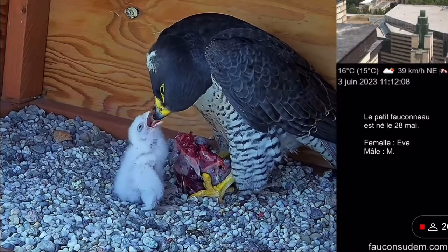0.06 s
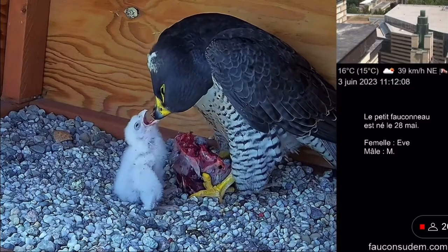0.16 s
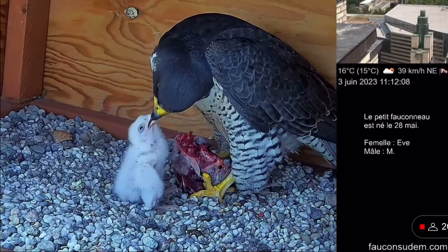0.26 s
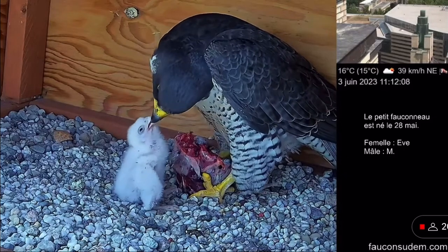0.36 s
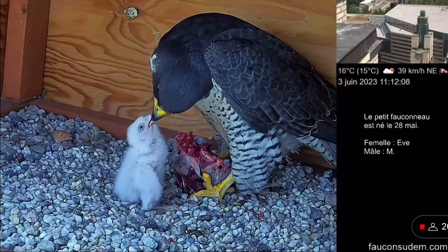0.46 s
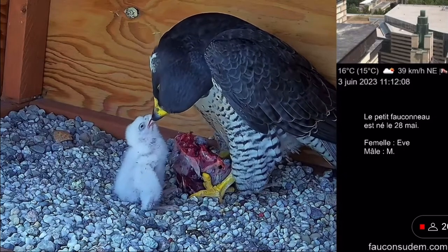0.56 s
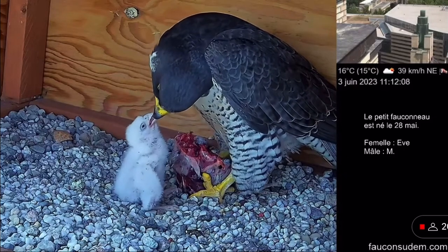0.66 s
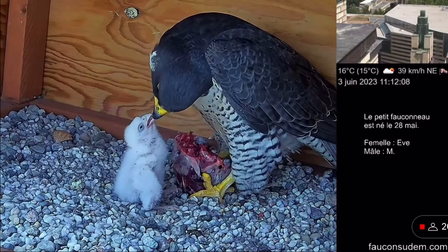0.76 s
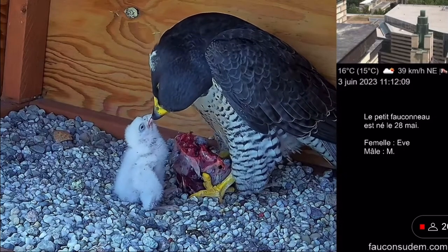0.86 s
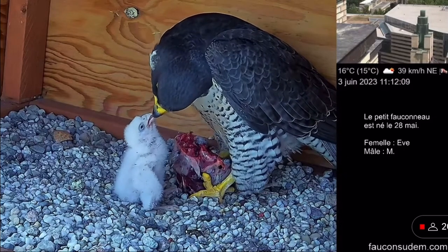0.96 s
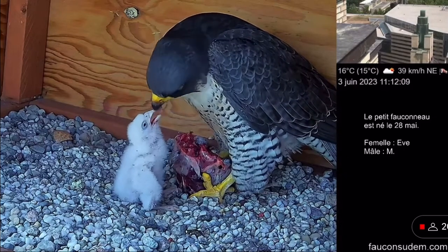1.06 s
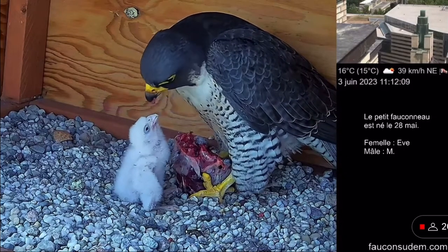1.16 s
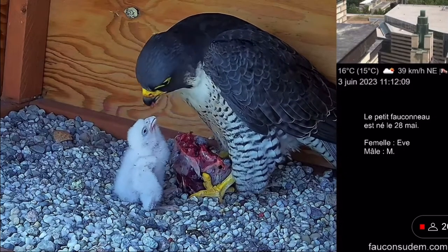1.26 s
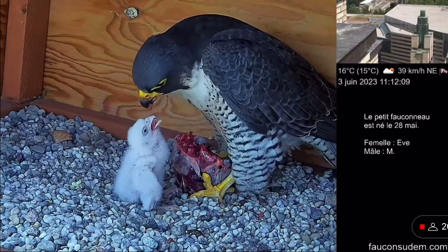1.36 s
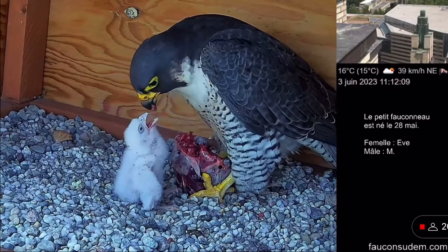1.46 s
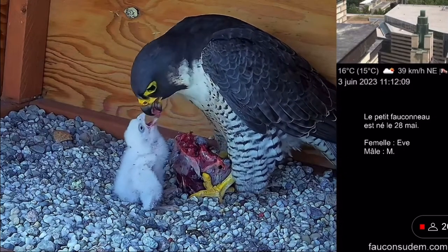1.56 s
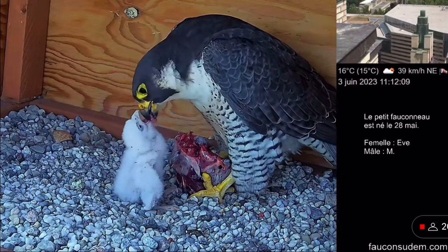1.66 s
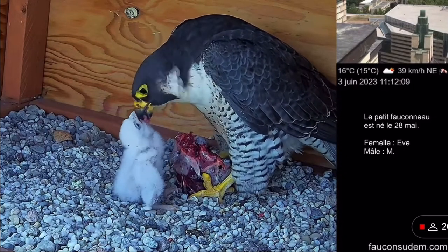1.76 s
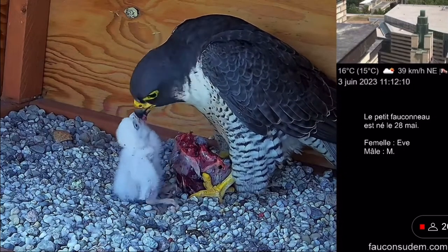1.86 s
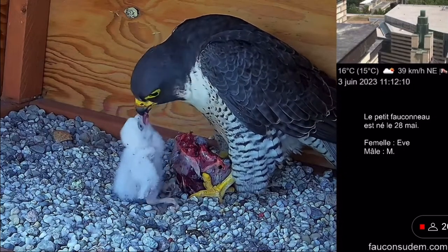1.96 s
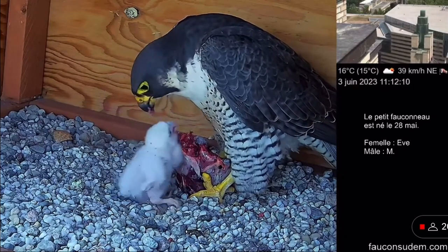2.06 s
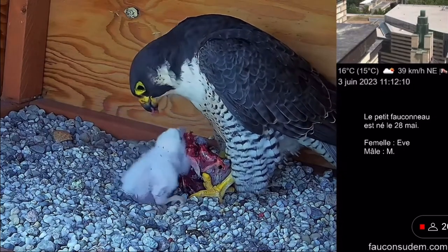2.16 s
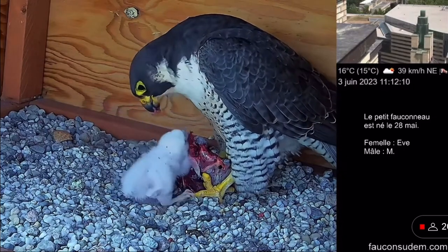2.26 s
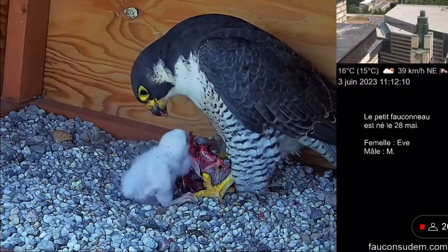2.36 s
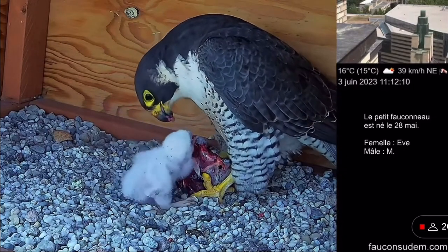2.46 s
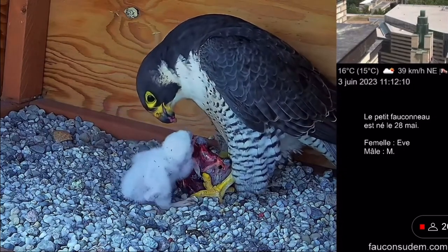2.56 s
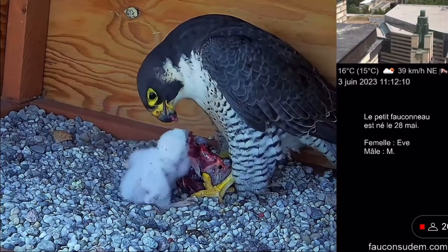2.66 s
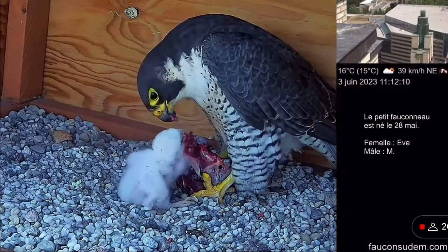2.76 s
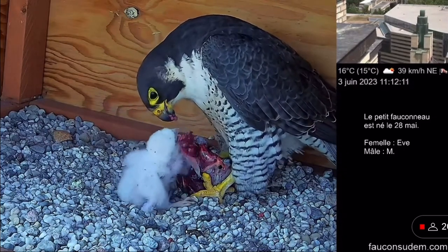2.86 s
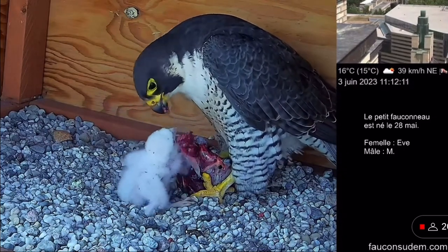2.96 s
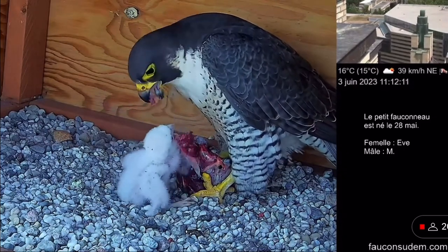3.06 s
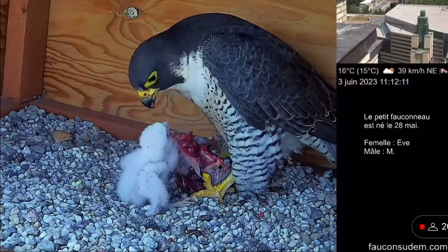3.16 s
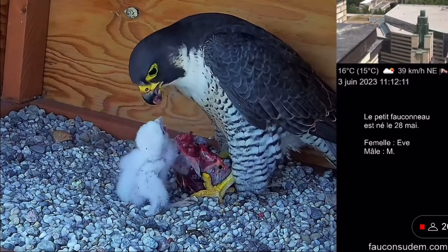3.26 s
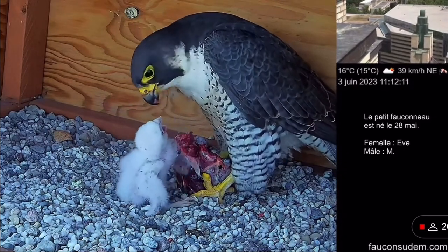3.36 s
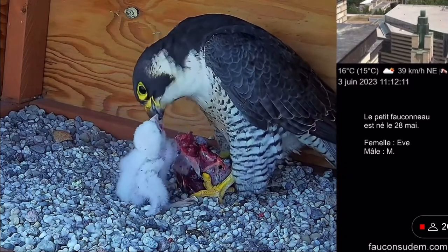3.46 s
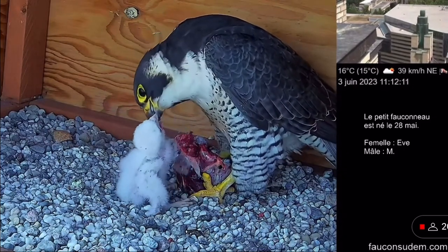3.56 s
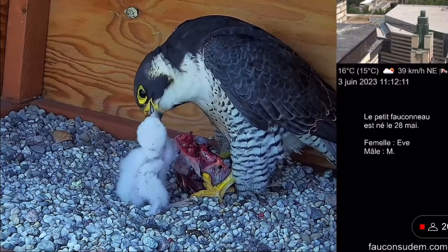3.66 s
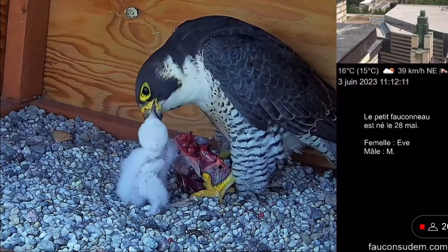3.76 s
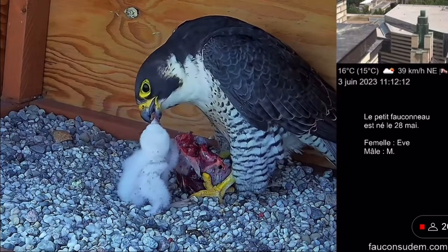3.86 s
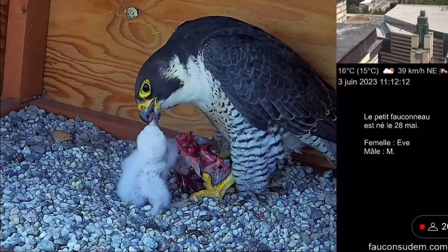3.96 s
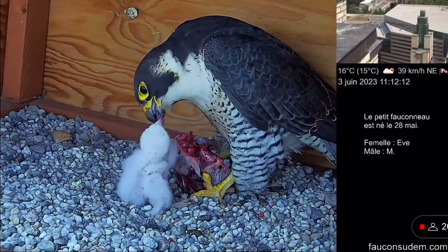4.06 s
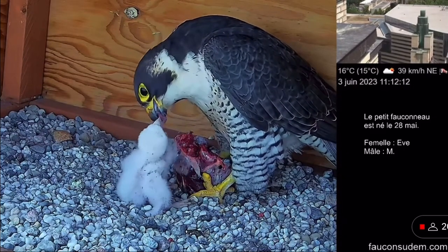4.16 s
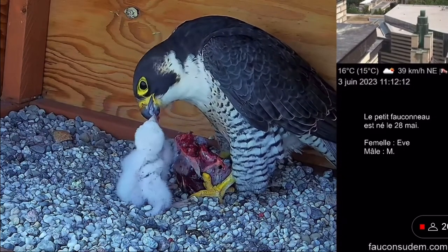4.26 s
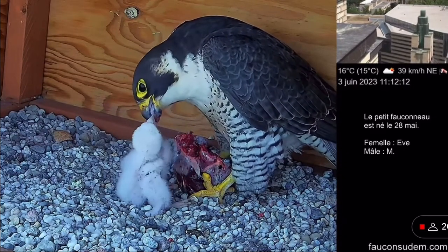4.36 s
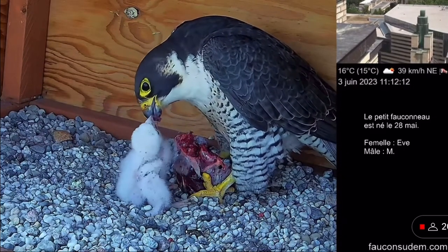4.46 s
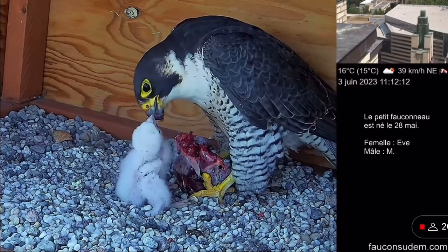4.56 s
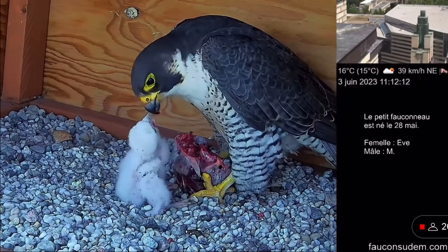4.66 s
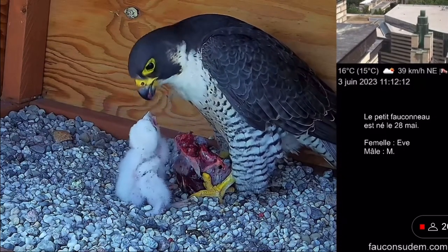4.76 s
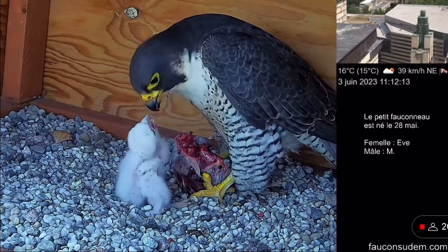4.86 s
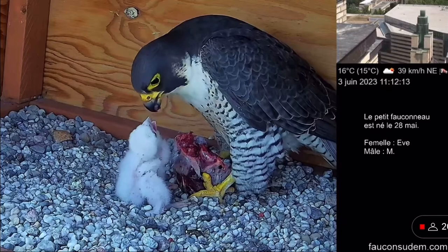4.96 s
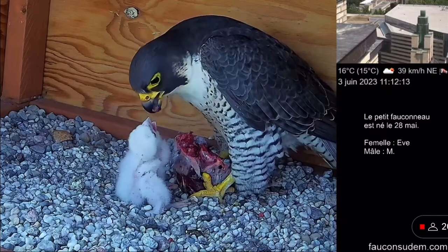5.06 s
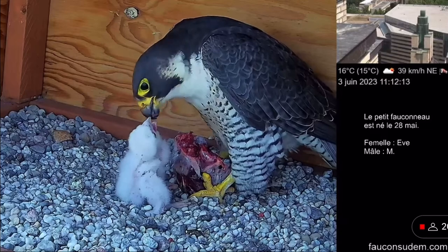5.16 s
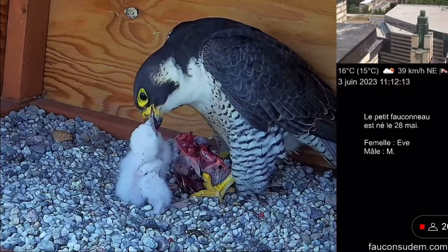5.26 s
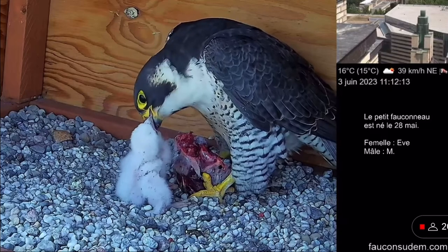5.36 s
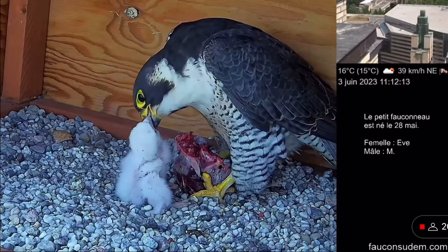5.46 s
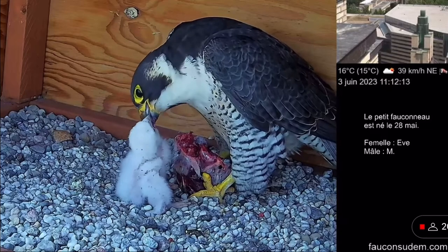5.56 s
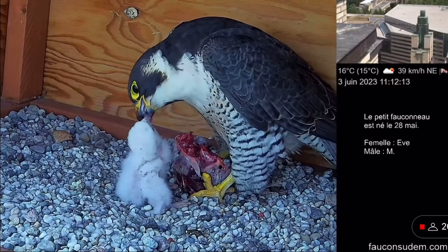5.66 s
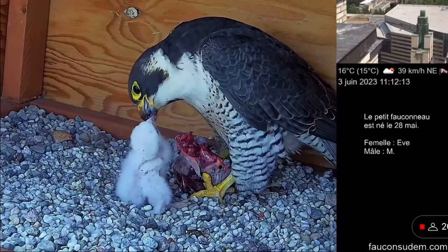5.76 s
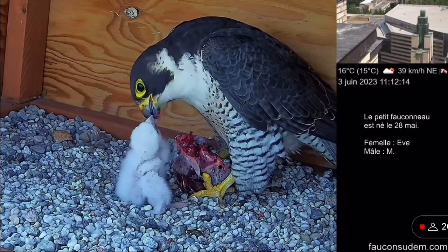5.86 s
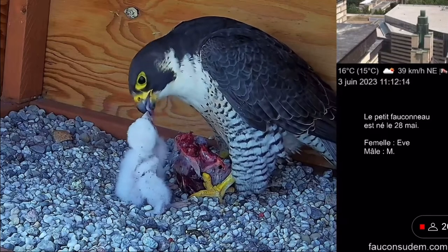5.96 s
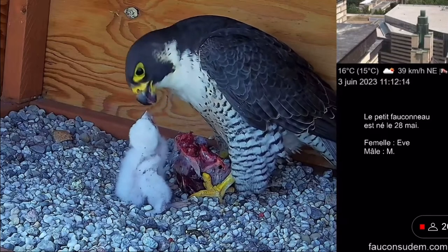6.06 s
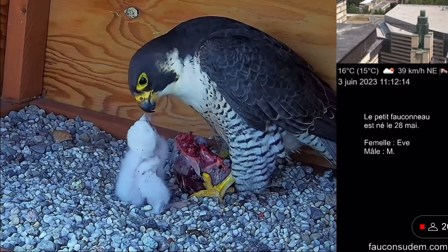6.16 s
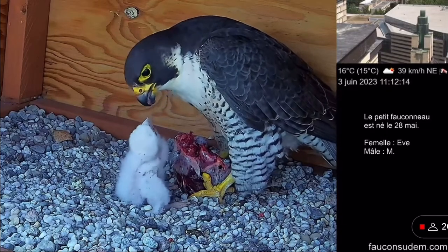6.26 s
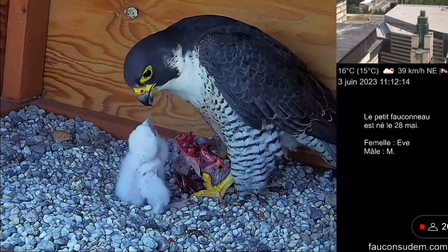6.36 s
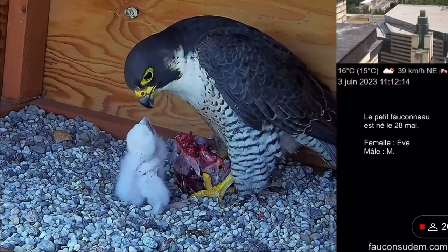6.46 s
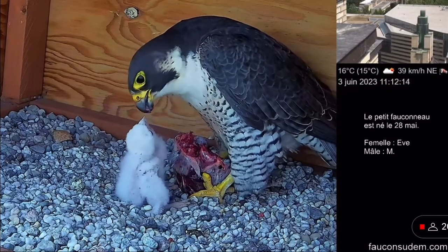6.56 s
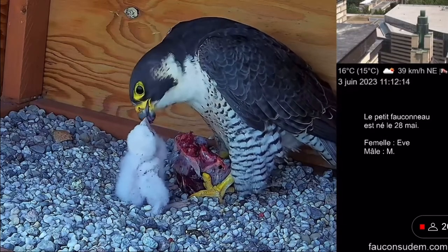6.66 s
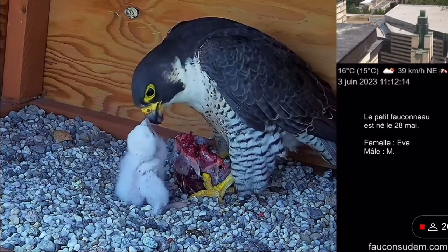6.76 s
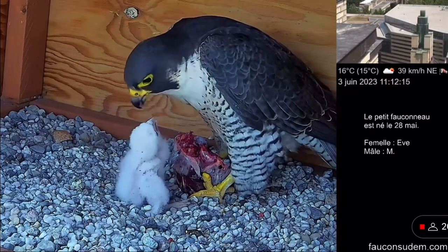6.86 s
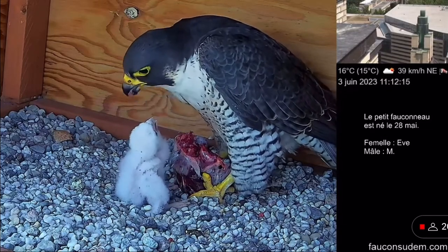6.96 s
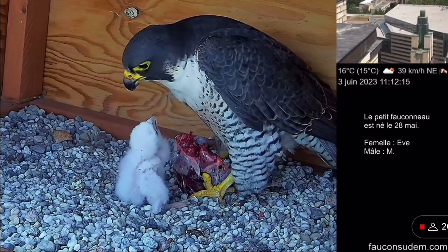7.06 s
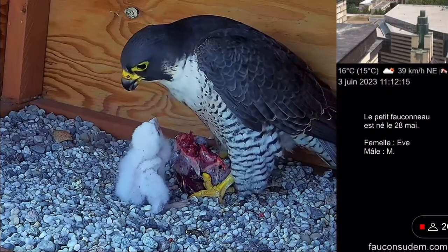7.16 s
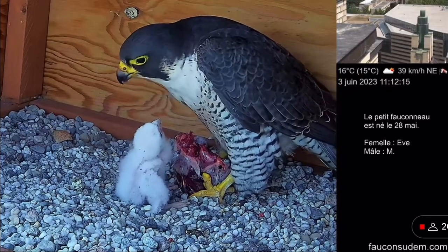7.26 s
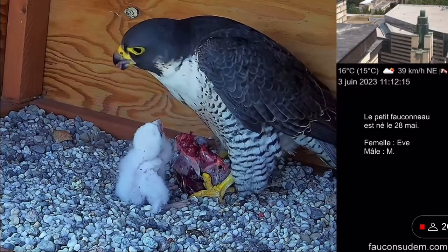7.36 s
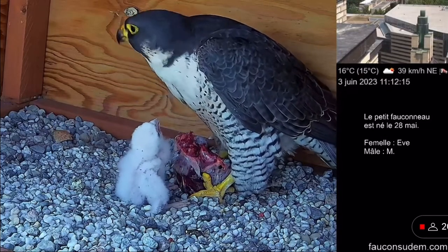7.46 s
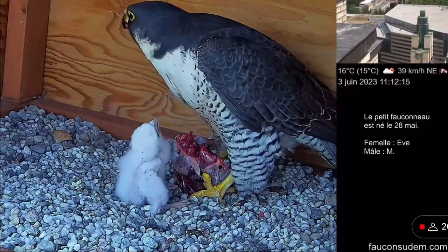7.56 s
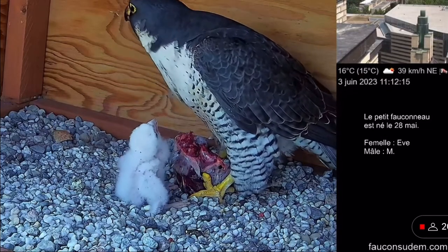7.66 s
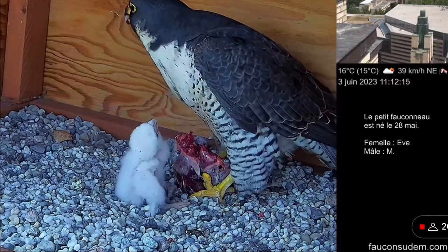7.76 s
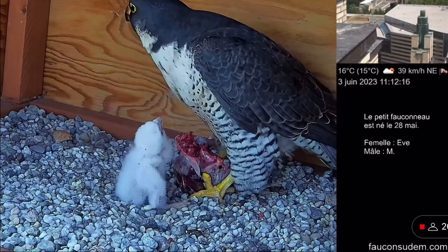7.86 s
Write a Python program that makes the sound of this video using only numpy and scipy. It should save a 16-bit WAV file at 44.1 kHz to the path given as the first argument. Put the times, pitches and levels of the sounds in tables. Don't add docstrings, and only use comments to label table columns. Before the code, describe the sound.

Wind thumps and flutters on a microphone, then eases to a soft city drone while a falcon and its chick exchange brief chirps and clucks.

```python
import sys
import numpy as np
from scipy import signal
from scipy.fft import rfft, irfft, next_fast_len
from scipy.io import wavfile
from scipy.ndimage import uniform_filter1d, map_coordinates

SR = 44100
rng = np.random.default_rng(int(sys.argv[2]) if len(sys.argv) > 2 else 0)


def digitize_waveform(pressure):
    field = np.atleast_2d(pressure).T
    bounded = np.clip(field, -1, 1)
    quanta = np.round(bounded * 32767).astype(np.int16)
    wavfile.write(sys.argv[1], SR, quanta)


def invert_db(x):
    u = np.asarray(x, float) / 20
    return 10 ** u


N = 348390
TIME = np.arange(N) / SR

# (time after the start [s], level under peak [dB], share above 3 kHz [dB],
# share below 1 kHz [dB], throat resonance [Hz], beak resonance [Hz], pitch over start pitch [ratio])
PEEP = [
    (0, -20, 12.5, 0, 2150, 3850, 1),
    (.009, -11.5, 5, 12, 2150, 3756, 0.95),
    (.022, 0.5, -3.5, -1.5, 2140, 3810, .92),
    (.04, -6.5, -11.5, -3, 2060, 3900, .89),
    (.062, -21.5, -16.5, 4, 1950, 3950, 0.88),
]
SQUEAL = [
    (0, -34, 5, 5, 2396, 4300, 1),
    (.012, -11.5, 11, -2, 2420, 4350, .96),
    (.02, 1.5, -4.5, -2, 2418, 4220, .93),
    (.04, -6.5, -2.5, 5, 2330, 4150, .83),
    (.068, -22.5, -22, 0, 2030, 4100, .72),
]
CLUCK = [
    (0, -18, -12, -14, 2480, 3500, 1),
    (.011, -10, -14, -10, 2400, 3500, 0.89),
    (.016, 0.5, -17.5, 0, 1500, 3450, .94),
    (.032, -3, -16, 1, 1370, 3330, .78),
    (.048, -10, -16, 5.5, 1410, 3300, .56),
    (.072, -26.5, -20, 9, 1410, 3400, .52),
]
MURMUR = [
    (0, -32, -12, 17, 1420, 3900, 1),
    (.008, -1, -21, 5.5, 1420, 3900, .99),
    (.022, -5, -11, 7.5, 1414, 4023, 1),
    (.038, -28, -5, 7, 1395, 4100, 0.765),
]
# (time [s], peak [dB], start pitch [Hz], weight of the low end [dB], brightness [dB])
PEEPS = [
    (1.247, -39, 776, -3, 5.5),
    (1.7, -38.5, 773, 3, -1),
    (4.215, -43.5, 770, 10, 0),
    (5.979, -38, 791, 3, -8.5),
    (7.27, -35.5, 815, 2.5, 2),
]
SQUEALS = [
    (2.974, -34.5, 1295, 2.5, -2),
    (6.475, -33, 1350, 4, 4),
]
MURMURS = [
    (.99, -53, 462, -6, -6),
    (2.33, -56.5, 477, -2, 2),
    (4.725, -52.5, 507, -4, -2),
    (6.823, -50, 479, -2.5, -8),
]
# (time [s], peak [dB], start pitch [Hz], length over the shape [ratio])
CLUCKS = [
    (1.027, -36.5, 866, 0.92),
    (2.387, -44.5, 846, 0.6),
    (4.781, -39, 848, 0.67),
    (6.867, -39.5, 782, .75),
]


def falcons():
    x = np.zeros(N)
    for voice, rows in [(PEEP, PEEPS), (SQUEAL, SQUEALS), (MURMUR, MURMURS)]:
        for row in rows:
            x += call(voice, *row)
    for s, db, pitch_hz, stretch in CLUCKS:
        x += call(CLUCK, s, db, pitch_hz, stretch=stretch)
    return x


def call(voice, s, db, pitch_hz, low_db=0, high_db=0, stretch=1):
    gape_hz = 185 * high_db * (voice is SQUEAL)
    rows = np.multiply(voice, [stretch, 1, 1, 1, 1, 1, pitch_hz])
    rows = rows + [s, db, high_db, low_db, 0, gape_hz, 0]
    rest_hz = 461
    rows[:, -1] = np.maximum(rows[:, -1], rest_hz)
    sound = chirp(rows, jitter=.012, rasp=.33)
    return np.pad(sound, (round(s * SR), N))[:N]


BREATH = signal.butter(3, [2600, 7600], "bandpass", fs=SR, output="sos")


def chirp(rows, jitter, rasp):
    t = np.arange(rows[0][0], rows[-1][0], 1 / SR)
    size = len(t)
    level_db, high_db, low_db, throat_hz, beak_hz, pitch = curves(rows, t)
    late = np.linspace(0, 1, size)
    unsteady = 1 + jitter * (.5 + 2 * late ** 2) * wobble(306.3, size=size)
    phase = 2 * np.pi * np.cumsum(pitch * unsteady) / SR
    strained = np.mean(throat_hz) > 1800
    throat_hz = throat_hz + (2480 - throat_hz) * np.exp(-((t - t[0]) / 0.0048) ** 2)

    k = np.arange(1, 29)[:, None] / 2
    hz = k * pitch
    throat = np.where(strained, .06, .2) + 1 / (1 + ((hz - throat_hz) / 350) ** 2)
    throat = throat * (hz > 1200) / (1 + (hz / 2900) ** 8)
    beak = 0.18 + 1 / (1 + ((hz - beak_hz) / 380) ** 2)
    beak = beak + .5 / (1 + ((hz - (1.95 - .5 * late) * beak_hz) / 600) ** 2)
    beak = invert_db(high_db) * beak / (1 + (2900 / hz) ** 8)
    chest = invert_db(low_db - 4.5) * (hz <= 1200) * (k >= 1) * np.clip(650 / hz, .6, 1.5) ** 2
    chest = chest * np.where(strained & (hz < 950), .12, 1)

    drift = .6 * wobble(100, size=size)
    sac = invert_db(low_db - 12.0) * strained * np.clip(850 / pitch, 0, 1) ** 3
    sac = sac * np.cos(2 * np.pi * 865 * t + 2.08 * drift)

    whole = np.where(k % 1 == 0, 1, 0.034 + .5 * late ** 2)
    flicker = invert_db(1.5 * np.array([wobble(150, size=size) for _ in k]))
    voice = np.cos(k * phase + rng.uniform(0, 2 * np.pi, k.shape))
    turbulence = np.array([wobble(889, size=size) for _ in k])
    smear = 1 + rasp * (1.2 + 1.4 * late) * turbulence
    tone = np.sum((throat + beak + chest) * whole * flicker * smear * voice, axis=0)

    breath = unit(signal.sosfilt(BREATH, rng.standard_normal(size)))
    breath = breath * invert_db(high_db - 9) * (1 + np.cos(phase))
    return invert_db(level_db) * signal.windows.tukey(size, .15) * (tone + breath + sac)


# (frequency [Hz], width [Hz], level [dB])
BOX = [(464, 230, -0.5), (800, 140, 11), (1130, 250, 4), (1350, 111, 6.5), (1720, 280, 3.5), (2150, 350, 3),
       (2550, 500, -1), (3156, 93, 4), (3450, 74, 4.5), (4090, 880, -1.5), (5160, 1170, -2), (5820, 470, 3),
       (6600, 350, -3), (7050, 450, -5)]


def box(x, wet_db, t60):
    def response(f):
        total = 0
        for k, (centre, width, db) in enumerate(BOX):
            damping = 1j * f * width
            total = total + (-1) ** k * invert_db(db) * damping / (centre * centre - f * f + damping)
        return total / (1 + (f / 8300) ** 6)

    rung = filtered(x, response)
    t = np.arange(SR // 8) / SR
    tail = rng.standard_normal(len(t)) * invert_db(-60 * t / t60) * (t > .002)
    tail = tail / np.linalg.norm(tail)
    return rung + invert_db(wet_db) * signal.fftconvolve(rung, tail)[:N]


# (time [s], length [s], start pitch [Hz], end pitch [Hz], level [dB])
WHISTLES = [(2.953, 0.02, 5719, 6500, -52), (2.961, 0.024, 6680, 6640, -45.5),
            (4.749, 0.042, 5462, 6000, -64), (5.966, 0.016, 5800, 5740, -52), (2.79, .06, 7250, 7250, -81),
            (3.13, .06, 4870, 4800, -76), (3.285, .055, 4780, 4830, -75), (3.365, 0.0775, 4750, 4800, -72),
            (3.461, .045, 4700, 4550, -75), (3.38, 0.0639, 6500, 6600, -77),
            (3.457, 0.055, 6740, 6530, -77), (4.575, 0.038, 6700, 6940, -72),
            (4.701, 0.099, 6480, 6500, -74), (4.705, 0.076, 4250, 4350, -77), (5.18, .04, 7200, 6900, -77),
            (5.236, 0.053, 6750, 6650, -75), (5.758, 0.0755, 4700, 4927, -76)]


def whistles():
    x = np.zeros(N)
    for s, length, from_hz, to_hz, db in WHISTLES:
        u = np.arange(round(length * SR)) / (length * SR)
        pitch = (from_hz + (to_hz - from_hz) * u) * (1 + 0.0061 * wobble(150, size=len(u)))
        tone = np.sin(2 * np.pi * np.cumsum(pitch) / SR)
        x[round(s * SR):][:len(u)] += invert_db(db) * np.sin(np.pi * u) * tone
    return x


# (time [s], peak [dB], ring [Hz])
PUFFS = [(.003, -27, 305), (.012, -8, 520), (0.026, -33, 330), (0.093, -27, 252), (0.126, -17, 352),
         (.215, -19.5, 318.6), (.399, -24.5, 200), (0.444, -32, 150), (0.574, -19.5, 280), (.6, -23.5, 286),
         (.83, -30, 203), (1.217, -26.5, 190), (1.314, -20, 390), (1.373, -27, 277), (1.403, -15.5, 405),
         (1.43, -21, 365), (1.444, -23.5, 510), (1.471, -27.5, 280), (1.794, -28, 220), (1.829, -21.5, 300),
         (7.395, -25, 354), (7.423, -21, 393), (7.47, -22.5, 500), (7.547, -20, 290), (7.561, -18.5, 434),
         (7.58, -26, 293), (7.609, -27, 220), (7.643, -12, 478), (7.666, -26, 274), (7.858, -23.5, 480)]


def puffs():
    x = np.zeros(N + SR)
    t = np.arange(SR // 20) / SR
    for s, db, hz in PUFFS:
        swell = (1 - np.exp(-t / 0.0021)) * invert_db(-60 * t * hz / 9)
        pitch = hz * (1 + 0.29 * wobble(270, size=len(t)))
        swing = np.sin(2 * np.pi * np.cumsum(pitch) / SR)
        x[round(s * SR):][:len(t)] += invert_db(db + 1.0) * swell * swing
    return x[:N]


# (time [s], half length [s], flutter [dB], deep pressure [dB])
GUSTS = [(0.005, 0.025, -25, -36), (0.099, 0.059, -37, -39), (0.228, 0.036, -42, -41),
         (0.317, 0.046, -52, -44), (0.466, 0.072, -45, -47), (0.598, 0.03, -41, -43),
         (0.666, .03, -45.5, -51), (0.835, 0.084, -48, -44), (1.21, 0.043, -44.5, -45.5),
         (1.306, 0.044, -40.5, -45), (1.382, 0.041, -37.5, -50), (1.442, 0.03, -39, -50),
         (1.817, .055, -44.5, -45), (2.329, 0.042, -70, -59.5), (3.736, 0.13, -66, -58),
         (7.418, 0.048, -36.5, -52), (7.49, 0.048, -50, -50), (7.607, 0.074, -35, -42.5),
         (7.765, 0.047, -51, -54), (7.904, 0.052, -41.5, -35.5)]
# (frequency [Hz], density [dB per Hz])
FLUTTER = [(47, -28), (80, -10.5), (113, -11), (247, -0.5), (340, -4.5), (429, -3.5), (468, -5), (774, -15),
           (1500, -25.5), (1950, -50), (3300, -120)]


def gusts():
    wind_db, = curves(WIND)
    fast = invert_db(-81.5 + 1.75 * (wind_db - wind_db.mean()))
    slow = 0
    fade_db = 9
    for s, half, flutter_db, deep_db in GUSTS:
        fast = fast + invert_db(flutter_db - fade_db * ((TIME - s) / half) ** 2)
        slow = slow + invert_db(deep_db - fade_db * ((TIME - s) / (1.06 * half)) ** 2)
    lumps = invert_db(2.3 * wobble(30) + 3 * wobble(110))
    flutter = fast * unit(lumps * rush(FLUTTER, patchy_db=3.0))
    swings = slow * unit(invert_db(2.5 * wobble(14)) * rush(DEEP, patchy_db=1.2))
    return flutter + swings


# (time [s], strength [dB])
WIND = [(0.0, -64), (0.33, -65), (0.61, -61.5), (1.98, -65), (2.62, -71), (3.78, -75.5), (4.05, -74.5),
        (4.66, -72.5), (5.81, -73), (6.69, -75), (7.15, -74), (7.3, -69), (7.44, -66), (7.9, -67.5)]
# (frequency [Hz], density [dB per Hz])
CITY = [(53, -27.5), (90, -9.5), (161, -7), (231, -6), (293, -2), (361, 0), (383, -6.5), (452, 2.5),
        (494, 0.5), (541, -0.5), (751, -6), (940, -1.5), (1040, -6), (2270, -17), (3200, -68.5),
        (4160, -72), (7040, -120)]
HISS = [(1350, -7), (2300, -1.5), (2860, -8.5), (5390, -10.5), (6690, -18), (8690, -31), (11300, -62.5),
        (19100, -120)]
DEEP = [(8.8, -24), (15, -7.5), (28, 4.5), (59, -0.5), (160, -3), (210, -12.5), (350, -120)]


def air():
    wind_db, = curves(WIND)
    swell_db = wind_db - wind_db.mean()
    city_db = -52 + 0.49 * swell_db
    rumble_db = -64.5 + .9 * swell_db + 2.8 * wobble(4.5)
    hiss_db = wind_db + 4.5 + 0.37 * wobble(2.62)
    city = invert_db(city_db) * rush(CITY, patchy_db=0.7)
    hiss = invert_db(hiss_db) * rush(HISS, patchy_db=1.5)
    rumble = invert_db(rumble_db) * rush(DEEP, patchy_db=3)
    return city + hiss + rumble


# (frequency [Hz], density [dB per Hz])
SELF_NOISE = [(6000, -9), (9000, -8), (11500, -9.5), (13700, -11), (14400, -19)]


def self_noise():
    return invert_db(-91.5) * rush(SELF_NOISE, patchy_db=-0.8)


def rush(spectrum, patchy_db):
    z = signal.stft(rng.standard_normal(N), nperseg=512)[2]
    field = uniform_filter1d(rng.standard_normal(z.shape), size=6, axis=0)
    field = uniform_filter1d(field, size=12, axis=1)
    patchy = signal.istft(z * invert_db(patchy_db * unit(field)), nperseg=512)[1][:N]
    f, db = np.transpose(spectrum)

    def colour(hz):
        return invert_db(np.interp(np.log(hz + 1), np.log(f), db, -120, -120))

    return unit(filtered(patchy, colour))


def filtered(x, response):
    m = next_fast_len(N + SR // 2)
    return irfft(rfft(x, m) * response(np.fft.rfftfreq(m, 1 / SR)), m)[:N]


def wobble(rate, size=N):
    return map_coordinates(rng.standard_normal(size), [np.arange(size) * rate / SR])


def curves(rows, t=TIME):
    s, *cols = np.transpose(rows)
    return [np.interp(t, s, c) for c in cols]


def unit(x):
    return x / np.sqrt(np.mean(x ** 2) + 1e-20)


def scene():
    birds = box(invert_db(1.5) * falcons(), wet_db=-2, t60=0.021)
    return (birds + whistles() + air() + gusts() + puffs())[None]


def roll_off(x):
    return signal.sosfilt(signal.butter(12, 14400, fs=SR, output="sos"), x)


def record(dry):
    return roll_off(dry + self_noise())


dry = scene()
out = record(dry)
digitize_waveform(out)
```